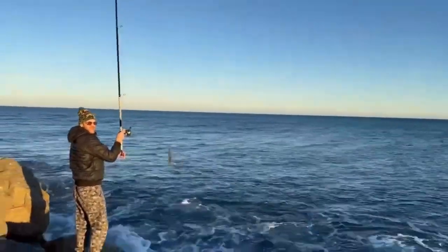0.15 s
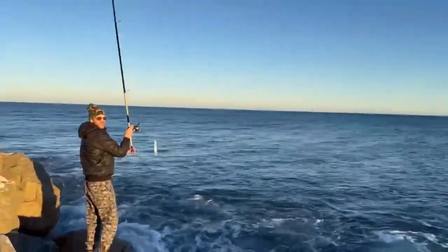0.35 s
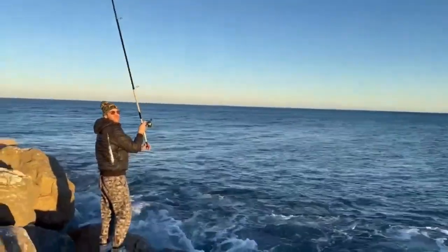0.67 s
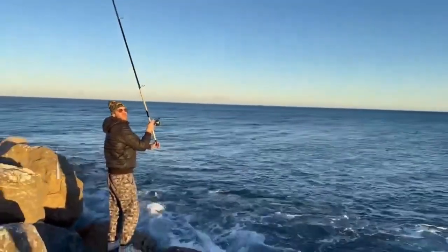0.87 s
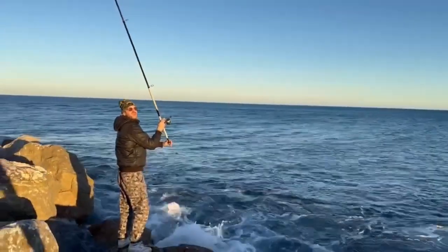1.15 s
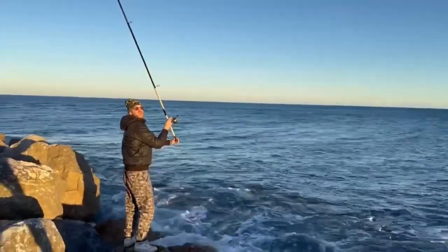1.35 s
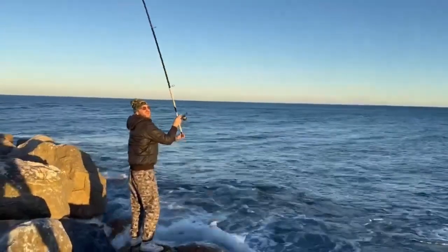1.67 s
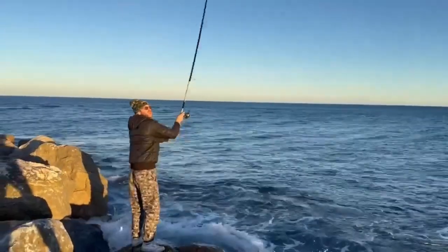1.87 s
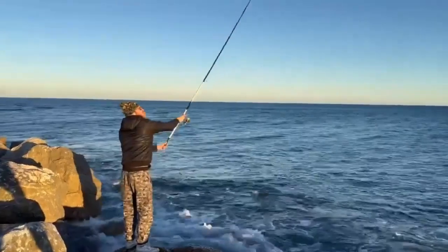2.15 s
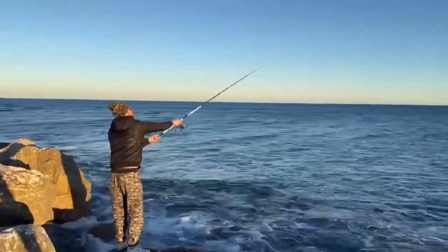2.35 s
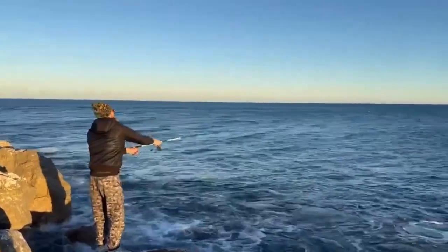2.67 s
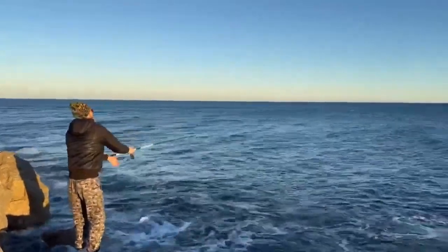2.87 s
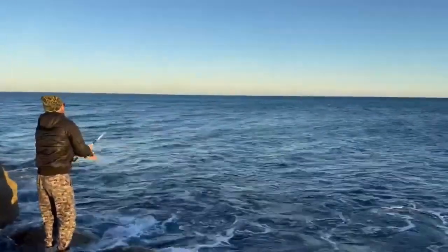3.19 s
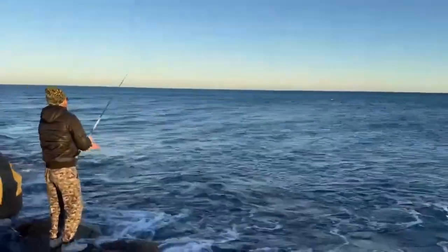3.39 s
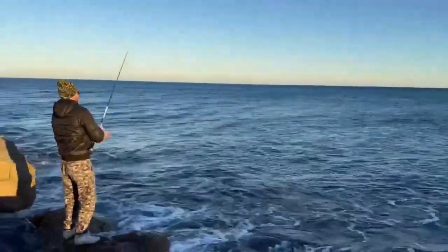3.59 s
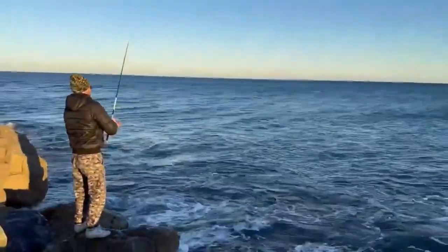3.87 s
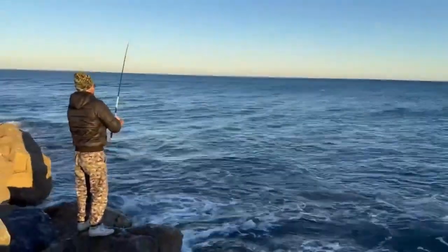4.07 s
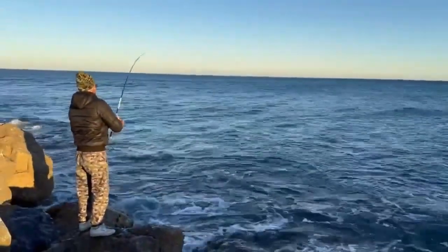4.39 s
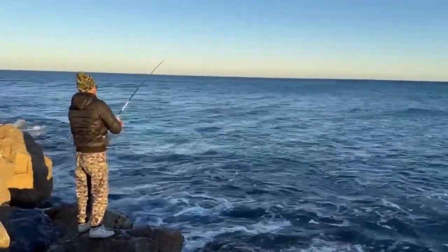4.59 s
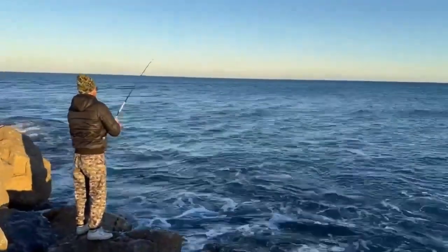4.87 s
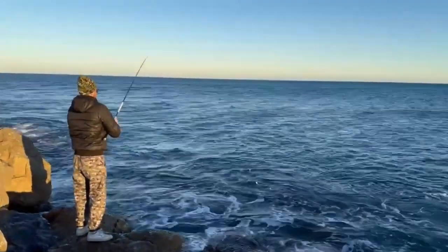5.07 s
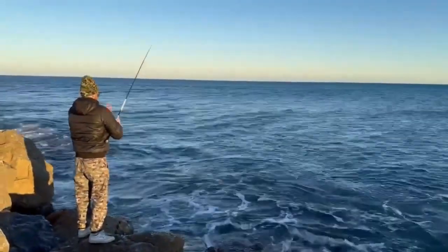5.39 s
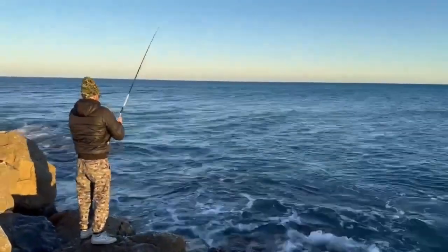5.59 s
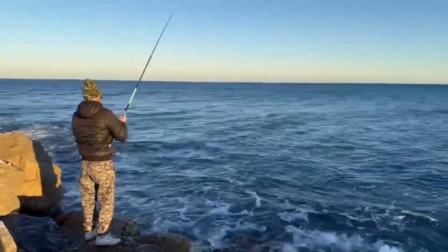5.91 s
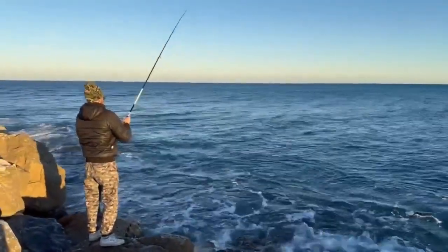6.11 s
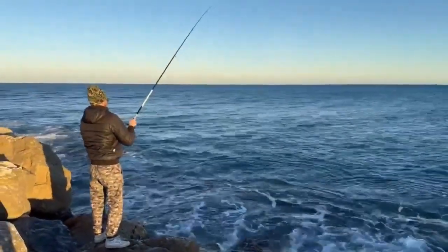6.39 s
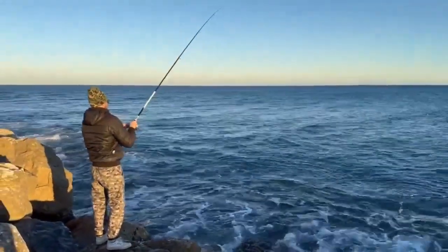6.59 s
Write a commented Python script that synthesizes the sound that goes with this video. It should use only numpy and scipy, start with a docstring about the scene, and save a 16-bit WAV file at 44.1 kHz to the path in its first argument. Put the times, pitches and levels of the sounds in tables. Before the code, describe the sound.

Outdoors on a boulder shore, close stereo microphones catch a swell already rolling in, breaking at about one and a half seconds with low boom, dense churn and hissing spray. Hollow gulps of trapped air sound under the rocks. It ebbs after three seconds into slaps, drops and trickling runoff, then a second wash with much less bass foams up on the right. A faint breeze rumbles at the microphones.

```python
"""A boulder shore: a swell rolls in, breaks and drains, then a second wash with less bass foams up on the right.
Filtered noise and bubble clicks, steered by the waves' levels, make the boom, churn, white water, spray and foam.
Gliding sine pings make air pockets and single bubbles; short noise bursts make slaps, splashes and drops nearby.
Low noise makes the light breeze at the two microphones, and water pours off the ledges between the waves."""
import sys
import numpy as np
from scipy import signal
from scipy.fft import rfft, irfft, next_fast_len
from scipy.io import wavfile

SR = 44100
rng = np.random.default_rng(int(sys.argv[2]) if len(sys.argv) > 2 else 0)


def store_wav(level_fs):
    """Save 16-bit WAV to argv[1]."""
    pcm = np.round(np.clip(np.atleast_2d(level_fs), -1, 1) * 32767)
    wavfile.write(sys.argv[1], SR, pcm.T.astype(np.int16))


N = 297498


def from_db(db):
    """Decibels to gain."""
    return 10 ** (np.asarray(db) / 20)


def rms_one(x):
    """Scale to unit rms."""
    return x / np.sqrt(np.mean(x ** 2) + 1e-20)


def at_hz(rows, hz):
    """Each column of a spectrum at one frequency or more, on a logarithmic frequency scale."""
    points, *columns = np.transpose(rows)
    return [np.interp(np.log(hz), np.log(points), c) for c in columns]


def pan(left_db):
    """Left and right gains of constant power, left_db apart."""
    gains = from_db(np.array([[.5], [-.5]]) * left_db)
    return gains / np.sqrt(np.mean(gains ** 2, axis=0))


def all_round(turn):
    """Left and right weights, signs included, for a direction given as a fraction of a turn."""
    return np.array([np.cos(2 * np.pi * turn), np.sin(2 * np.pi * turn)])


def decay(t, t60):
    """Exponential fall by 60 dB in t60."""
    return np.exp(-np.log(1000) * t / t60)


def hump(s, half_s):
    """A smooth rise and fall of height 1 around time s, down to 1/e after half_s."""
    return np.exp(-((np.arange(N) / SR - s) / half_s) ** 2)


def lifts_db(surges):
    """A table of short surges as curves over time, one for each lift column."""
    return sum(np.outer(lifts, hump(s, half_s)) for s, half_s, *lifts in surges)


def drift(rate):
    """Smooth chance that changes about rate times a second; spread 1."""
    step = 40   # samples between the slow values
    r = np.exp(-2 * np.pi * rate * step / SR)
    slow = signal.lfilter([1], [1, -2 * r, r * r], rng.standard_normal(N // step + 2002))
    slow = rms_one(slow[2000:])   # settled part only
    return np.interp(np.arange(N) / step, np.arange(len(slow)), slow)


def band(x, low_hz, high_hz):
    """Butterworth band-pass."""
    return signal.sosfilt(signal.butter(2, [low_hz, high_hz], "band", fs=SR, output="sos"), x)


def add(out, s, sound):
    """Mix a short stereo sound in at time s."""
    start = max(int(s * SR), 0)
    out[:, start:start + sound.shape[1]] += sound[:, :N - start]


def bursts(per_s, spread_db):
    """Clicks of bursting bubbles: many small, few large, each from its own direction."""
    at = np.flatnonzero(rng.random(N) < per_s / SR)
    size, turn = rng.random((len(at), 2)).T
    strength = from_db(spread_db * np.minimum(-np.log(1 - size), 4))
    clicks = np.zeros((2, N))
    clicks[:, at] = strength * all_round(turn)
    return rms_one(clicks)


def water(colour, per_s, grain_share, spread_db, patchy_db, surge_db, surge_rate, count, darker_db=0):
    """A cloud of bubbles in count size bands: far ones merge into noise, near ones are clicks that ring briefly."""
    edges = np.geomspace(colour[0][0], colour[-1][0], count + 1)
    far = rng.standard_normal((2, 2, N))
    out = np.zeros((2, N))
    for k, (low, high) in enumerate(zip(edges, edges[1:])):
        hz = np.sqrt(low * high)
        drive = np.sqrt(1 - grain_share) * far[k % 2]
        if grain_share > 0:
            drive += np.sqrt(grain_share) * bursts(per_s / count, spread_db)
        tilt_db = darker_db * np.log2(np.median(edges) / hz)
        # each size band comes and goes on its own
        band_db = at_hz(colour, hz)[0] + tilt_db + patchy_db * drift(16.0)
        out += band(drive, low, high) * from_db(band_db)
    # small wavelets lift all sizes together
    return rms_one(out * from_db(surge_db * drift(surge_rate)))


def single_bubbles(per_s, low_hz, high_hz, cycles, rise, spread_db, tilt):
    """Single bubbles pinch off and ring, gliding up; small ones are higher and tend to be fainter."""
    out = np.zeros((2, N))
    for when, pitch, size, turn in rng.random((int(per_s * N / SR), 4)):
        hz = low_hz * (high_hz / low_hz) ** pitch
        t60 = cycles / hz
        t = np.arange(int(SR * t60)) / SR
        ring = np.sin(2 * np.pi * hz * t * (1 + rise * t / t60 / 2))
        ping = (1 - np.exp(-t * hz)) * decay(t, t60) * ring
        strength = from_db(spread_db * min(-np.log(1 - size), 3)) * (low_hz / hz) ** tilt
        add(out, when * N / SR, strength * np.outer(all_round(turn), ping))
    return rms_one(out)


# Gusts on the microphones: (time [s], level [dB])
GUSTS = [(2.12, -35), (2.88, -40), (3.15, -38), (3.77, -37), (3.97, -43), (4.52, -44), (5.45, -43),
         (5.72, -37.5), (5.91, -39), (6.24, -39), (6.72, -38)]
GUST_S, BREEZE_DB = 0.075, -48   # half length of a gust [s]; light air between gusts [dB]


def wind_db():
    """Level of the breeze: the powers of light air and short gusts add."""
    gusts = sum((from_db(db) * hump(s, GUST_S)) ** 2 for s, db in GUSTS)
    return 10 * np.log10(from_db(BREEZE_DB) ** 2 + gusts)


# Relative spectrum of the wind rumble: (frequency [Hz], density [dB per Hz])
BREEZE_COLOUR = [(18, -7), (36, -7), (52, 15), (80, 5), (160, -20)]


def breeze(level_db, left_db=2.0, shared=0.74, count=6):
    """Eddies rumble on the microphones; a shared part of their power reaches both at once."""
    edges = np.geomspace(BREEZE_COLOUR[0][0], BREEZE_COLOUR[-1][0], count + 1)
    own = rng.standard_normal((2, 2, N))
    common = rng.standard_normal((2, 1, N))
    eddies = np.sqrt(1 - shared) * own + np.sqrt(shared) * common
    rumble = np.zeros((2, N))
    for k, (low, high) in enumerate(zip(edges, edges[1:])):
        gain = from_db(at_hz(BREEZE_COLOUR, np.sqrt(low * high))[0])
        rumble += band(eddies[k % 2], low, high) * gain
    return from_db(level_db) * rms_one(rumble) * pan(left_db)


# Relative spectrum of the streams: (frequency [Hz], density [dB per Hz])
RUNOFF_COLOUR = [(480, -3), (620, 1.5), (850, -10), (1100, -3), (1400, -3), (1900, -9), (2200, -18)]
# Water off the ledges between the waves:
# (start [s], time to full flow [s], full flow lasts [s], time to run dry [s], stream level [dB])
RUNOFF = (4.5, 0.2, 0.55, 0.1, -44.5)


def runoff(bubbles_db=-7):
    """Thin streams pour off the ledges as grainy noise and babble in the pools below as single bubbles."""
    s, rise_s, lasts_s, dry_s, level_db = RUNOFF
    flow = np.interp(np.arange(N) / SR, s + np.cumsum([0, rise_s, lasts_s, dry_s]), [0, 1, 1, 0])
    stream = water(RUNOFF_COLOUR, 900, grain_share=0.23, spread_db=2.0, patchy_db=3.5,
                   surge_db=2.0, surge_rate=24, count=7)
    babble = single_bubbles(per_s=90, low_hz=480, high_hz=1900, cycles=37, rise=0.15,
                            spread_db=3.0, tilt=0.5)
    return from_db(level_db) * flow * (stream + from_db(bubbles_db) * babble)


# Fat drops on dry stone close by, level before the common trim:
# (time [s], level [dB], centre pitch [Hz], left-right [dB])
DROPS = [(.188, -28.5, 4600, 1), (.42, -33, 6500, -4), (.991, -28, 6000, -7), (1.249, -31, 4500, -7),
         (2.715, -32, 4500, -8), (2.977, -32, 5500, -7), (3.149, -32, 5000, 2), (3.164, -29, 8000, -2),
         (3.524, -35, 8000, -2), (4.713, -28, 4500, -2), (5.385, -30.5, 4000, -8), (6.522, -30, 4800, 3)]


def drops(t60=0.015, width=1.55, level_db=-4.0):
    """A drop bursts on stone with one short, bright tick of noise."""
    out, t = np.zeros((2, N)), np.arange(SR // 20) / SR
    for s, drop_db, hz, left_db in DROPS:
        noise = rms_one(band(rng.standard_normal((2, len(t))), hz / width, hz * width))
        add(out, s, from_db(drop_db + level_db) * noise * decay(t, t60) * pan(left_db))
    return out


# Splashes on near stones, level before the common trim:
# (time [s], level [dB], centre pitch [Hz], 60 dB decay [s], left-right [dB])
SPLASHES = [(0.72, -28, 1140, .08, -1), (0.801, -30, 1150, .1, 0), (1.075, -24, 900, 0.088, -2),
            (1.495, -22, 1100, .08, 0), (2.325, -27, 1380, 0.089, -3), (3.295, -29, 1170, .08, 0),
            (3.520, -21, 1010, 0.034, 1), (3.636, -19, 845, .08, 0), (3.912, -29, 1150, .2, 5),
            (3.964, -22.5, 1450, .08, -4), (4.598, -28, 1200, .1, -5), (4.611, -29, 1950, .07, -7),
            (4.668, -27, 1500, .12, -12), (4.754, -19, 720, 0.033, -1), (5.383, -20, 1490, .06, -9.5),
            (5.492, -24, 1700, 0.09, -11), (5.547, -21, 1200, .05, -12), (6.659, -29, 1820, .08, -1)]


def splashes(attack_s=0.0011, width=1.5, lumpy_db=1.5, level_db=-7.5):
    """A slap of water on stone, scattering at once into uneven drops: a lumpy, dying noise band."""
    out, t = np.zeros((2, N)), np.arange(SR // 4) / SR
    lumps = from_db(lumpy_db * drift(170))
    for s, splash_db, hz, t60, left_db in SPLASHES:
        noise = band(rng.standard_normal((2, len(t))), hz / width, hz * width)
        scatter = rms_one(noise * np.roll(lumps, -int(s * SR))[:len(t)])
        fall = (1 - np.exp(-t / attack_s)) * decay(t, t60)
        add(out, s, from_db(splash_db + level_db) * fall * scatter * pan(left_db))
    return out


# Air pockets slammed shut under the rocks:
# (time [s], level before attack and decay [dB], starting pitch [Hz], 60 dB decay [s], left-right [dB])
POCKETS = [(.518, -25.5, 534, 0.13, -2), (.57, -22, 482, .08, 0), (0.766, -21, 134, 0.2, 1),
           (.803, -32, 670, 0.11, -3), (1.088, -24, 373, .12, 3), (1.168, -17.5, 85, 0.3, 0.5),
           (1.216, -22.5, 139, 0.2, 5), (1.25, -24, 710, 0.1, -4), (1.545, -19.5, 242, 0.16, -2),
           (1.587, -20, 310, 0.16, 0), (1.715, -28, 950, .1, 0), (1.898, -26, 837, .1, 0),
           (1.903, -20, 457, 0.11, 2), (2.01, -21, 215, .14, 1), (2.055, -18.5, 154, 0.17, -1),
           (2.135, -18.5, 126, 0.15, 2.5), (2.2, -20, 89, 0.26, 1), (2.291, -22.5, 82, 0.19, 1),
           (2.308, -16.5, 375, .08, 0), (2.385, -18.5, 525, 0.1, -1), (2.479, -17.5, 87, 0.14, 1),
           (2.728, -20, 384, 0.11, 0), (2.802, -12, 462, 0.075, 5), (2.873, -21, 263, 0.14, 8),
           (2.971, -15.5, 1810, .025, -5), (3.134, -22, 492, 0.12, 2), (3.228, -21, 240, .12, 2),
           (3.407, -21, 308, 0.15, 10), (3.698, -18.5, 194, 0.12, 6), (3.715, -23, 330, .09, 5),
           (3.722, -21.5, 635, 0.11, 21), (4.302, -26, 280, 0.11, 0), (4.719, -25, 93, 0.14, 3),
           (4.752, -21, 650, 0.034, 0), (4.951, -28.5, 310, 0.13, 4), (4.992, -29, 475, 0.087, 4),
           (5.207, -31, 94, 0.17, 4), (5.218, -29, 588, 0.078, 0), (5.382, -29.5, 180, 0.19, -2),
           (5.459, -32, 1025, .1, -6), (5.659, -27, 480, 0.056, 0), (5.944, -23.5, 635, 0.076, -2),
           (6.215, -28, 120, .16, 1)]


def pockets(rise=0.25, attack_s=0.0046):
    """A trapped air pocket rings like a big bubble, rising in pitch as it nears the surface."""
    out, t = np.zeros((2, N)), np.arange(SR // 2) / SR
    for s, pocket_db, hz, t60, left_db in POCKETS:
        phase = 2 * np.pi * hz * (t + rise * t * t / (2 * t60))
        swing = (1 - np.exp(-t / attack_s)) * decay(t, t60)
        add(out, s, from_db(pocket_db) * swing * np.sin(phase) * pan(left_db))
    return out


# The breaker on the left, then the wash on the right: (break time [s], tumbling time [s],
# build [dB per s], ebb before the water's own pace [dB per s], suddenness of the break [factor],
# level [dB], extra weight in the bass, before the water's share [dB])
WAVES = [(1.52, 1.72, 4, 12.5, .8, 0, 0), (5.37, .86, 4.5, 8.5, 1.7, -0.55, -8.5)]
BREAK_S, SAG_DB_PER_S = .07, .5   # time a crest takes to topple; a broken wave slowly spends itself


def wave_powers(kind):
    """Power that each wave gives one kind of water: it builds, jumps as it breaks, tumbles on and ebbs."""
    _, broken_db, jump_db, delay_s, weight_share, ebb_pace = kind
    powers = []
    for s, tumble_s, build, ebb, sudden, level_db, weight_db in WAVES:
        age = np.arange(N) / SR - s - delay_s
        jump = sudden * jump_db * (np.tanh(age / BREAK_S) - 1) / 2
        rise_db = build * np.minimum(age, 0) + jump
        sag_db = SAG_DB_PER_S * np.maximum(age, 0)
        ebb_db = ebb_pace * ebb * np.maximum(age - tumble_s, 0)
        wave_db = broken_db + level_db + weight_share * weight_db
        powers.append(from_db(wave_db + rise_db - sag_db - ebb_db) ** 2)
    return np.array(powers)


def water_db(kind):
    """Level of one kind of water: both waves on top of the restless sea."""
    return 10 * np.log10(from_db(kind[0]) ** 2 + wave_powers(kind).sum(axis=0))


# Relative spectra of fine foam and spray: (frequency [Hz], density [dB per Hz])
FOAM_COLOUR = [(6800, -28), (8000, 3), (9300, 0), (10300, 0), (11600, -12)]
SPRAY_COLOUR = [(2500, 0.5), (3100, -1.5), (4200, 0.7), (4900, 0.5), (5350, -1.5), (6100, -3), (7000, -4.5)]
# How each answers a wave: (level between waves [dB], level once broken [dB], jump before suddenness [dB],
# delay [s], share of the wave's weight [factor], pace of the ebb [factor])
FOAM = (-61.5, -46, 1.9, -0.37, -0.1, 0.43)
SPRAY = (-51, -41.5, 2.2, -0.42, -0.05, 0.4)
# Sheets of spray thrown up and falling back: (time [s], half length [s], spray lift [dB], foam lift [dB])
SHOWERS = [(0.16, 0.07, 2, .5), (.425, .02, 2.5, 1), (1.0, 0.08, 1.5, 0.5), (1.3, .2, -1, -.5),
           (2.01, .09, 2, -1), (2.16, 0.2, 1.9, 3.5), (2.95, 0.17, 1.5, 3), (3.07, .015, 1, 1),
           (3.16, 0.036, 2, 5.5), (3.38, .1, 2.3, 1.5), (3.6, 0.056, -1, -1), (3.84, .11, 1.5, -1.5),
           (4.15, 0.18, -2, -1.5), (4.69, 0.058, 0.5, 1.5), (4.8, 0.056, -2.5, 0.5), (5.22, 0.21, -3, -1),
           (6.15, 0.2, 1, 1)]
# Coarse drops after the breaker, fine in the wash: (time [s], half length [s], bass tilt [dB per octave])
COARSENESS = [(3.3, 0.59, 2.4), (5.8, .6, -2)]


def spray_and_foam(vigour):
    """Spray patters in the treble and finer bubbles fizz above it; the two flutter together."""
    flutter_db = 0.4 * drift(21)
    spray_db, foam_db = lifts_db(SHOWERS) + [water_db(SPRAY), water_db(FOAM)] + flutter_db
    spray = water(SPRAY_COLOUR, 3500 * vigour, grain_share=0.086, spread_db=1.0, patchy_db=2.5,
                  surge_db=0.36, surge_rate=7.8, count=14, darker_db=lifts_db(COARSENESS)[0])
    foam = water(FOAM_COLOUR, 7000 * vigour, grain_share=0.06, spread_db=0.0, patchy_db=1.97,
                 surge_db=0.26, surge_rate=9.5, count=7)
    return from_db(spray_db) * spray + from_db(foam_db) * foam


# Relative spectra of the boom and the churn: (frequency [Hz], density [dB per Hz])
HEAVE_COLOUR = [(35, -35), (52, -7.5), (80, -1.5), (120, 0.5), (170, -8), (260, -22)]
CHURN_COLOUR = [(95, -16), (150, -2), (220, -0.5), (380, 2), (490, 0), (630, -5.5), (800, -7), (1100, -27),
                (1500, -6)]
# How each answers a wave: (level between waves [dB], level once broken [dB], jump before suddenness [dB],
# delay [s], share of the wave's weight [factor], pace of the ebb [factor])
HEAVE = (-48.5, -33, 3, -0.3, 2.3, 0.56)
CHURN = (-41, -28.5, 2.5, -0.02, 0.9, 0.57)
# Heavy water shoves in between the boulders or draws back:
# (time [s], half length [s], heave lift [dB], churn lift [dB])
SHOVES = [(0.55, 0.05, 4.5, 3), (0.74, 0.12, 5.5, 0), (1.02, .06, -2, -1), (1.22, 0.088, 2.5, 1),
          (1.58, 0.1, -3, .5), (1.82, 0.23, 2, .5), (2.12, 0.1, 0, 1.5), (2.25, 0.06, 4.5, -2),
          (2.68, .04, 1, 0), (3.23, 0.18, 2, 1.5), (3.78, 0.15, 2, 1), (4.1, 0.061, -1.5, -1.5),
          (4.30, 0.06, -1, 1), (4.55, 0.093, 2, -3), (5.08, .06, -4, 0.5), (5.88, 0.065, 5, -2),
          (6.4, 0.085, 1, 1.5), (6.68, 0.15, 1, 3.5)]


def heave_and_churn(vigour):
    """Heavy water booms as low noise, bubble clouds churn above it and single bubbles gurgle."""
    heave_db, churn_db = lifts_db(SHOVES) + [water_db(HEAVE), water_db(CHURN)]
    # a heavier plunge traps larger bubbles: dB per octave towards the bass
    plunge_db = 0.16 * (churn_db - churn_db.mean())
    heave = water(HEAVE_COLOUR, 0, 0, 0, patchy_db=0.8, surge_db=0.5, surge_rate=16, count=7)
    churn = water(CHURN_COLOUR, 1500 * vigour, grain_share=0.04, spread_db=1.0, patchy_db=1.3,
                  surge_db=0.77, surge_rate=21, count=10, darker_db=plunge_db)
    gurgle = single_bubbles(per_s=70, low_hz=189.9, high_hz=801, cycles=32.4, rise=0.24,
                            spread_db=2.5, tilt=0.19)
    return from_db(heave_db) * heave + from_db(churn_db) * (churn + from_db(-12) * gurgle)


def wavelets(per_s=28, low_hz=850, high_hz=2300, width=1.31, t60=0.075, attack_s=0.0049, spread_db=3.0):
    """Small crests slap over one another at random, each a noise band with its own pitch and side."""
    out, t = np.zeros((2, N)), np.arange(SR // 8) / SR
    fall = (1 - np.exp(-t / attack_s)) * decay(t, t60)
    for when, pitch, size, side in rng.random((int(per_s * N / SR), 4)):
        hz = low_hz * (high_hz / low_hz) ** pitch
        slap = rms_one(band(rng.standard_normal((2, len(t))), hz / width, hz * width))
        strength = from_db(spread_db * min(-np.log(1 - size), 2))
        add(out, when * N / SR, strength * fall * slap * pan(20 * (side - .5)))
    return rms_one(out)


# Relative spectra of the breaker's and the wash's white water: (frequency [Hz], density [dB per Hz])
BREAKER_COLOUR = [(520, 1.5), (800, -0.5), (1050, -1), (1300, 0.8), (1650, -3.5), (2150, -3), (2550, -10.5),
                  (3000, -45), (3500, -3)]
WASH_COLOUR = [(420, -11), (600, 5), (850, -7), (1100, 3), (1350, 2), (1700, 0.5), (2200, 0.5),
               (2550, -6.5), (2950, -29), (3500, -33)]
# How it answers a wave: (level between waves [dB], level once broken [dB], jump before suddenness [dB],
# delay [s], share of the wave's weight [factor], pace of the ebb [factor])
WHITE = (-42.5, -34.4, 3, 0.06, 0.08, 1.07)
# White water sloshes up the stones or sinks away: (time [s], half length [s], lift [dB])
SLOSHES = [(.78, 0.075, 0.2), (1.75, .12, .8), (2.98, 0.11, .6), (3.38, 0.084, 1), (3.85, 0.13, 1),
           (4.07, 0.043, 0), (4.66, 0.14, 1.5), (4.82, 0.052, -3.5), (5.53, .07, 0.5)]


def white_water(level_db, vigour):
    """The breaker rushes in, then the wash in its own colour; wavelets slap and water trickles off the stones."""
    # the second wave's part of the power
    share = np.clip(wave_powers(WHITE)[1] / from_db(level_db) ** 2, 0, 1)
    breaker = water(BREAKER_COLOUR, 3000 * vigour, grain_share=0.094, spread_db=1.0, patchy_db=2.5,
                    surge_db=0.46, surge_rate=18, count=12)
    wash = water(WASH_COLOUR, 7000 * vigour, grain_share=0.062, spread_db=1.0, patchy_db=1.1,
                 surge_db=0.1, surge_rate=24, count=12)
    trickle = single_bubbles(per_s=300, low_hz=855, high_hz=5580, cycles=73, rise=0.077,
                             spread_db=3.0, tilt=0.9)
    rush = np.sqrt(1 - share) * breaker + np.sqrt(share) * wash
    details = from_db(-9.5) * trickle + from_db(-11.5) * wavelets()
    return from_db(level_db + lifts_db(SLOSHES)[0]) * (rush + details)


# Treble at the two microphones, the same for all places: (frequency [Hz], left-right likeness in step,
# likeness with the right a quarter cycle ahead, left-right [dB])
TREBLE_IMAGE = [(3180, -0.072, -0.036, 1.5), (4000, 0.076, -0.1, 0.3), (5300, -0.23, 0.09, -1.5),
                (6270, 0.66, -0.05, 0.6), (6920, -0.29, 0.04, 2.5), (8300, -0.12, -0.0, -3.5),
                (9740, 0.15, 0.13, -2.5), (10920, 1, -0.01, -0.1)]


def heard_from(place, pair):
    """Turn two unrelated channels into what the microphones pick up from one place on the shore."""
    size = next_fast_len(N)
    hz = np.fft.rfftfreq(size, 1 / SR) + 1   # keeps the logarithm finite
    in_step, right_ahead, left_db = at_hz(np.vstack([place, TREBLE_IMAGE]), hz)
    alike = in_step + 1j * right_ahead
    alike = alike / np.maximum(abs(alike), 1)
    left, other = rfft(pair, size)
    right = alike * left + np.sqrt(np.maximum(1 - abs(alike) ** 2, 0)) * other
    return irfft(pan(left_db) * np.array([left, right]), size)[:, :N]


# Three places below the treble: (frequency [Hz], left-right likeness in step,
# likeness with the right a quarter cycle ahead, left-right [dB])
BREAKER_IMAGE = [(102, 1, 0.071, 0), (343, 0.84, 0.02, 2.3), (594, 0.35, 0.01, 1),
                 (950, -0.0039, 0.17, -1.0), (1300, -0.11, 0.16, -2), (1820, -0.33, -0.09, -2),
                 (2320, 0.17, 0.15, -1.7)]
DRAIN_IMAGE = [(100, 1, -0.0041, 1), (327, 0.56, -0.07, 1.5), (614, 0.25, -0.21, 3), (940, -0.61, -0.2, -2),
               (1320, -0.14, -0.21, -2.5), (1750, -0.2, -0.2, -4.5), (2380, 0.44, 0.066, -4)]
WASH_IMAGE = [(100, 0.72, -0.36, 0.5), (332, 0.95, -0.06, 1.5), (605, 0.085, -0.29, 0),
              (950, -0.11, -0.34, -3.5), (1300, -0.032, -0.48, -5), (1760, -0.095, -0.52, -10),
              (2400, 0.71, -0.16, -5.5)]
# when the backwash and the second wash take over, and how gradually [s]
DRAIN_AT_S, WASH_AT_S, HANDOVER_S = 3.44, 5.24, 0.35


def along_the_shore(pair):
    """The surf crossfades from the breaker on the left through the draining rocks to the wash on the right."""
    t = np.arange(N) / SR
    draining, washing = [(1 + np.tanh((t - s) / HANDOVER_S)) / 2 for s in (DRAIN_AT_S, WASH_AT_S)]
    breaker = (1 - draining) * heard_from(BREAKER_IMAGE, pair)
    drain = (draining - washing) * heard_from(DRAIN_IMAGE, pair)
    return breaker + drain + washing * heard_from(WASH_IMAGE, pair)


def scene():
    """Surf of every bubble size along the shore, with breeze, air pockets, splashes and drops close by."""
    white_db = water_db(WHITE)
    vigour = from_db(white_db - white_db.max())   # harder breaking makes more bubbles
    near = breeze(wind_db()) + drops() + splashes() + pockets()
    surf = runoff() + spray_and_foam(vigour) + heave_and_churn(vigour) + white_water(white_db, vigour)
    return along_the_shore(surf) + near


NOTCH_HZ, NOTCH_WIDTH_HZ, NOTCH_DEPTH = 7120, 1050, 0.6   # depth is the share of the notched sound
CUTOFF_HZ = 11300


def record(dry):
    """A narrow treble band is partly notched out and the top is cut steeply."""
    notched = signal.lfilter(*signal.iirnotch(NOTCH_HZ, NOTCH_HZ / NOTCH_WIDTH_HZ, fs=SR), dry)
    heard = dry + NOTCH_DEPTH * (notched - dry)
    return signal.sosfilt(signal.ellip(12, .1, 80, CUTOFF_HZ, fs=SR, output="sos"), heard)


dry = scene()
out = record(dry)
store_wav(out)
```